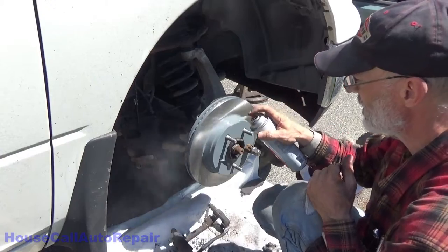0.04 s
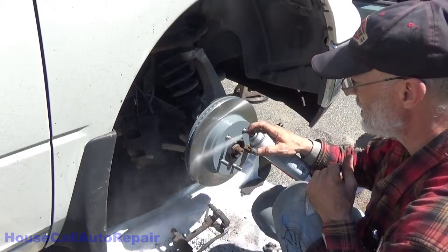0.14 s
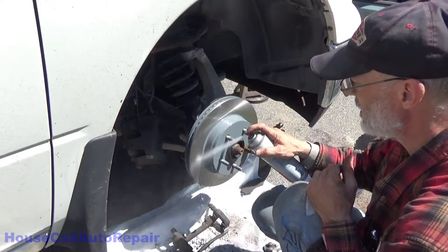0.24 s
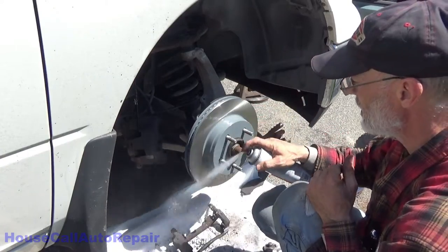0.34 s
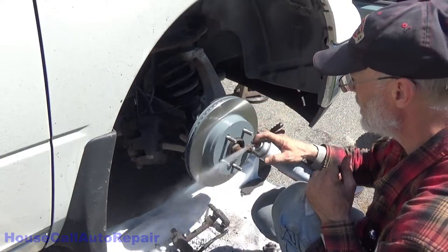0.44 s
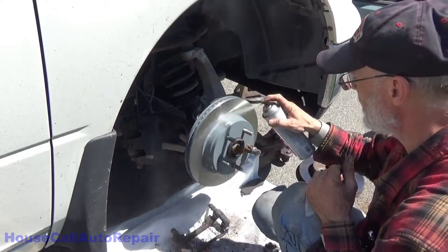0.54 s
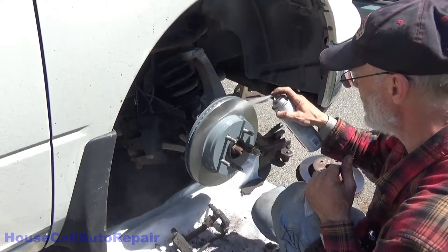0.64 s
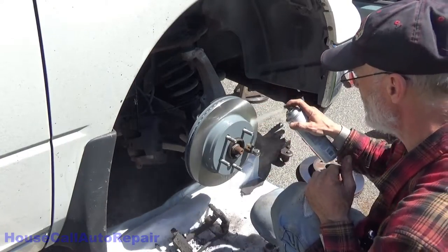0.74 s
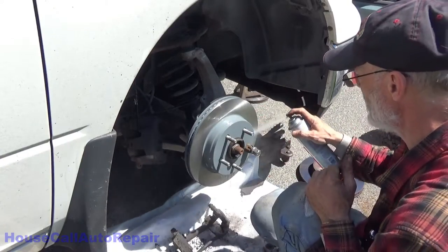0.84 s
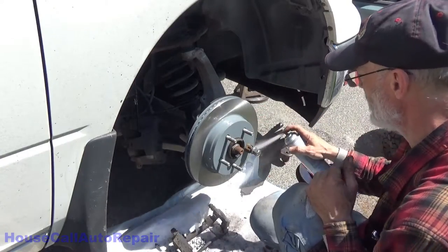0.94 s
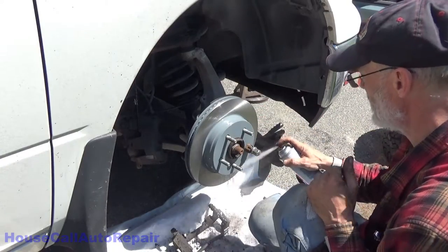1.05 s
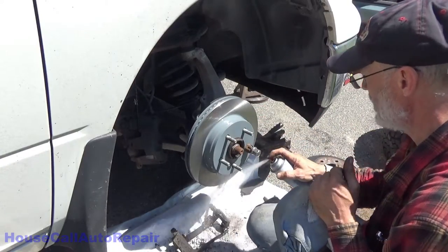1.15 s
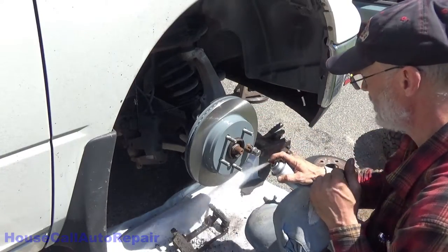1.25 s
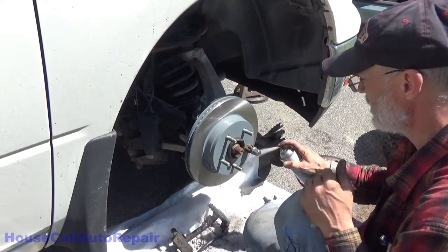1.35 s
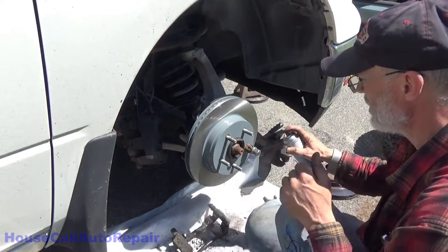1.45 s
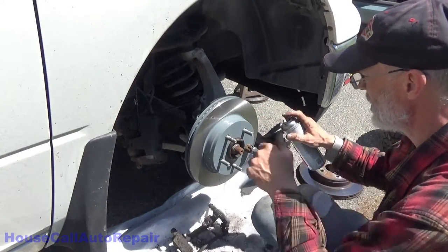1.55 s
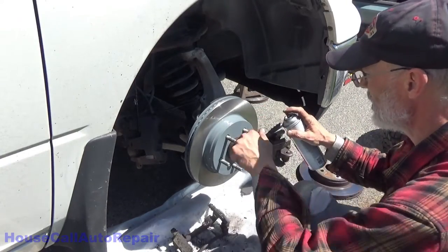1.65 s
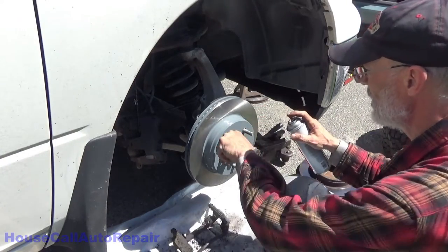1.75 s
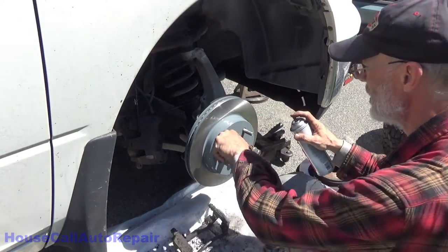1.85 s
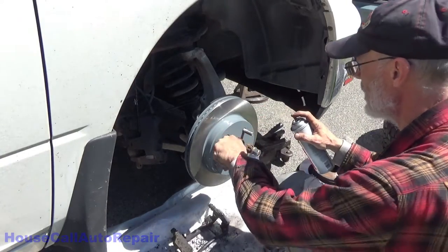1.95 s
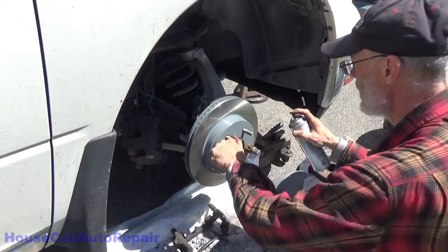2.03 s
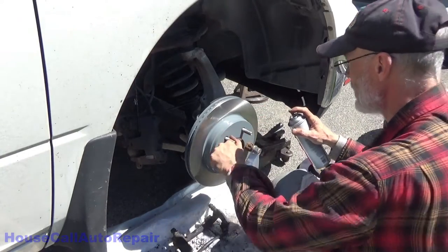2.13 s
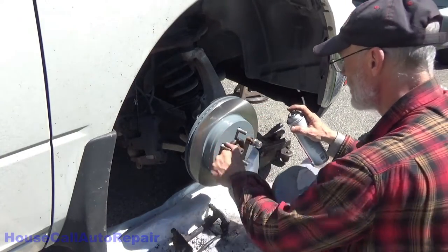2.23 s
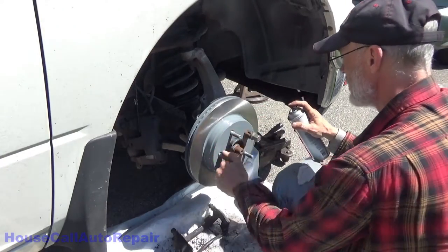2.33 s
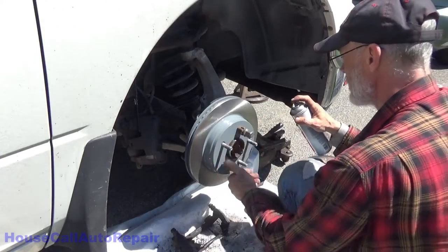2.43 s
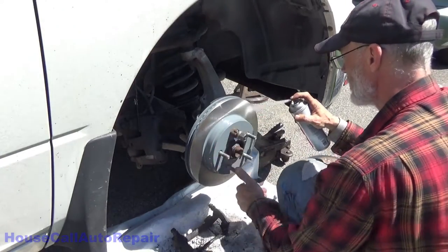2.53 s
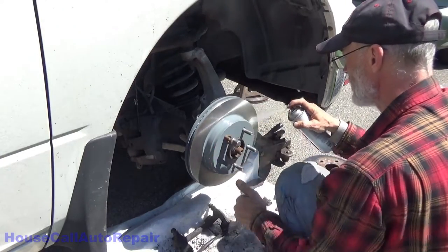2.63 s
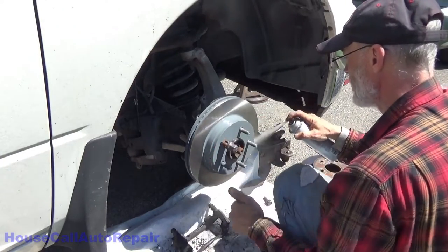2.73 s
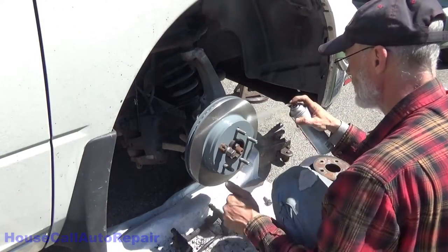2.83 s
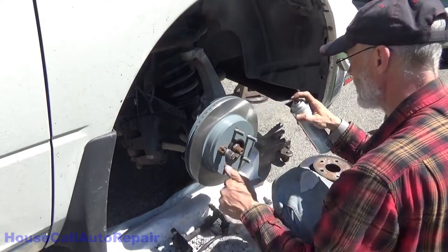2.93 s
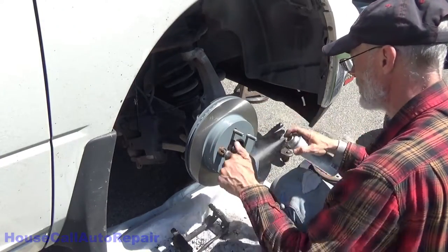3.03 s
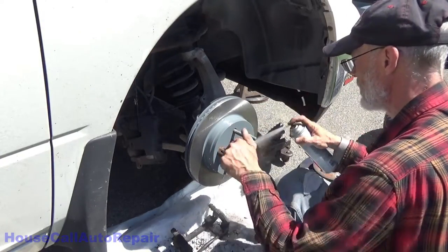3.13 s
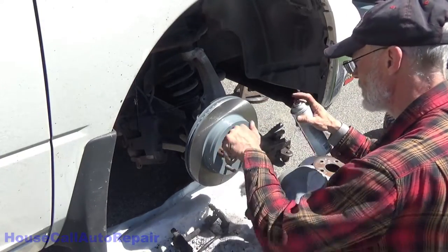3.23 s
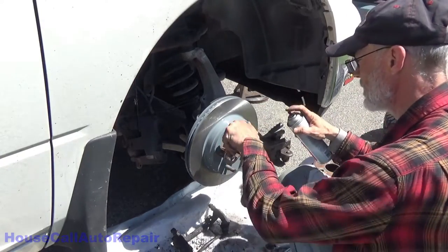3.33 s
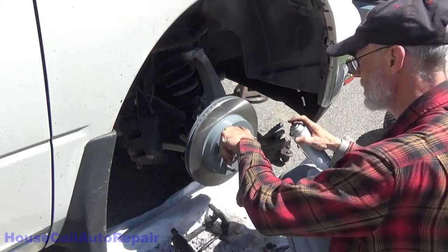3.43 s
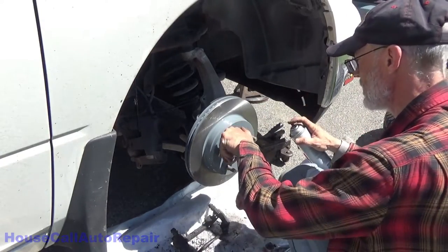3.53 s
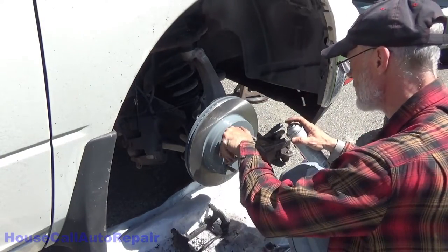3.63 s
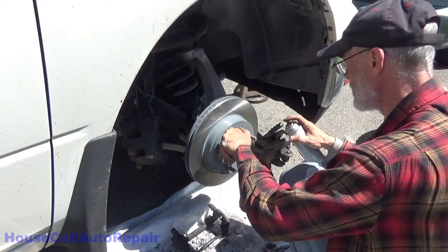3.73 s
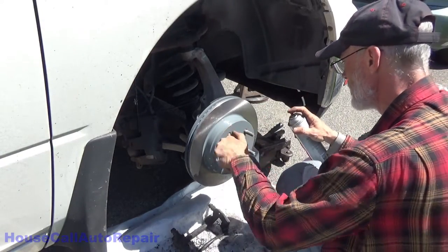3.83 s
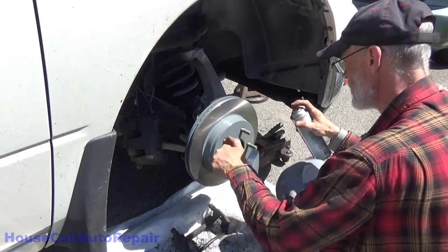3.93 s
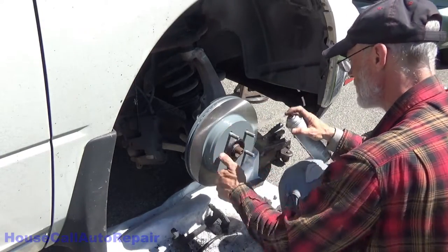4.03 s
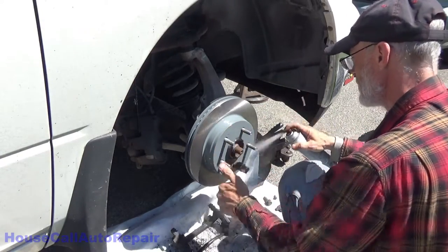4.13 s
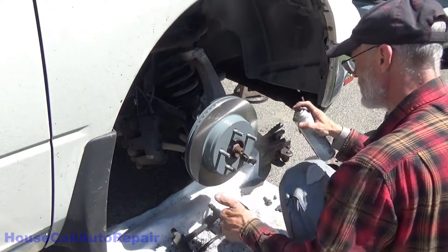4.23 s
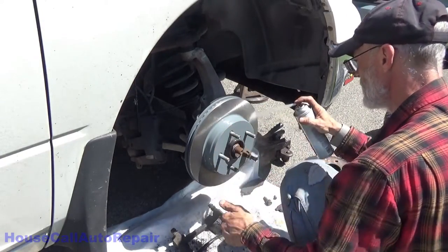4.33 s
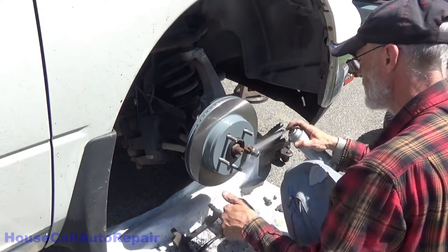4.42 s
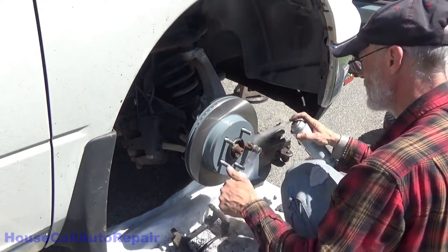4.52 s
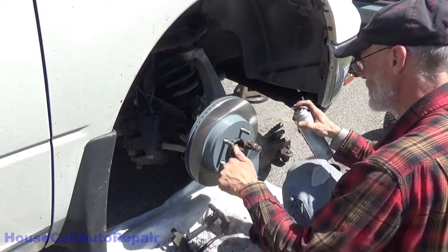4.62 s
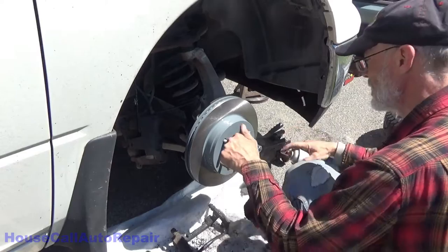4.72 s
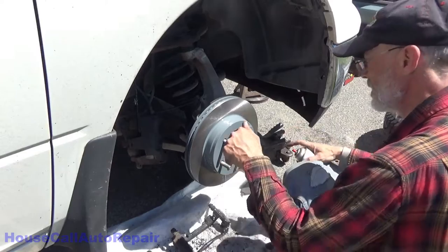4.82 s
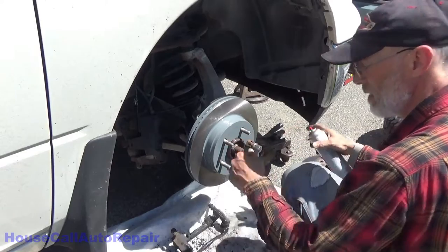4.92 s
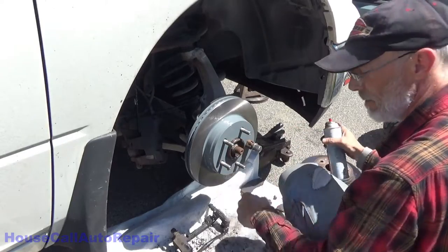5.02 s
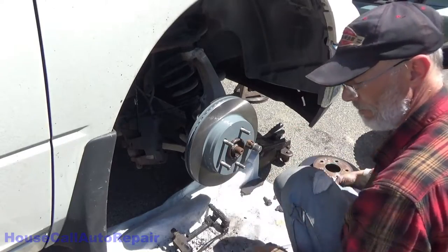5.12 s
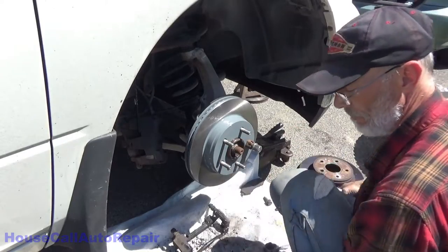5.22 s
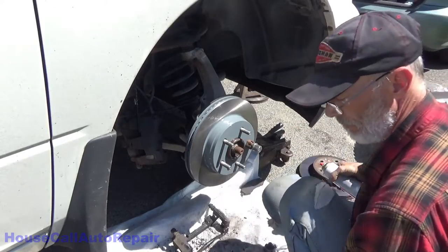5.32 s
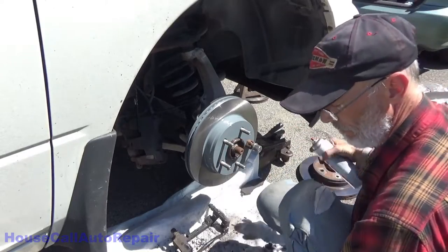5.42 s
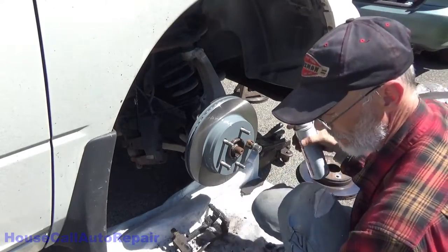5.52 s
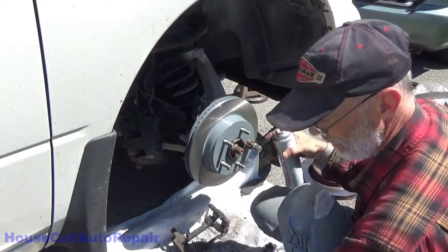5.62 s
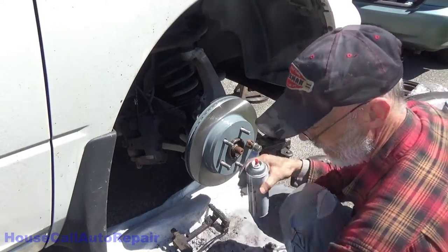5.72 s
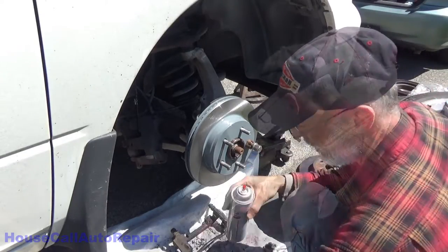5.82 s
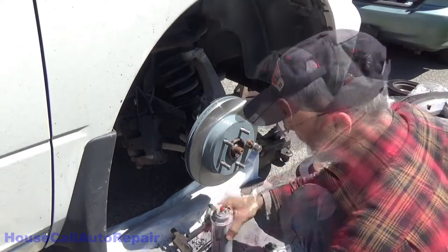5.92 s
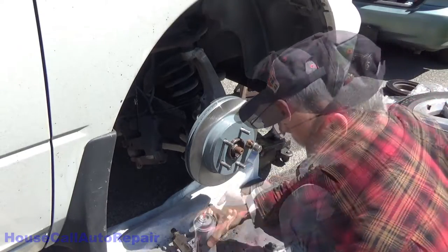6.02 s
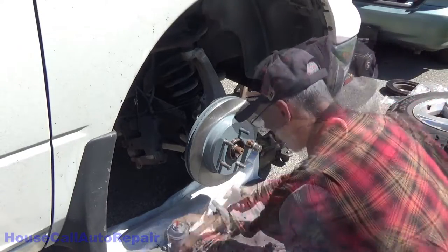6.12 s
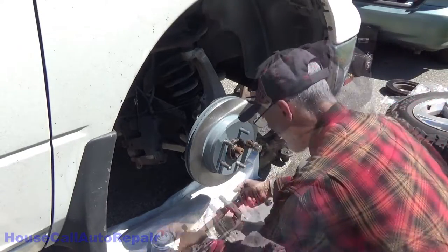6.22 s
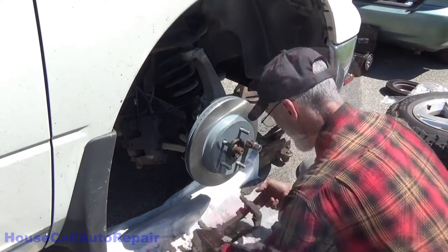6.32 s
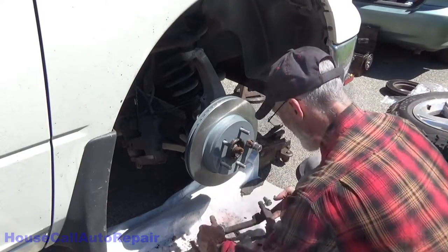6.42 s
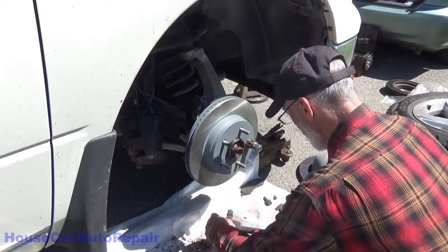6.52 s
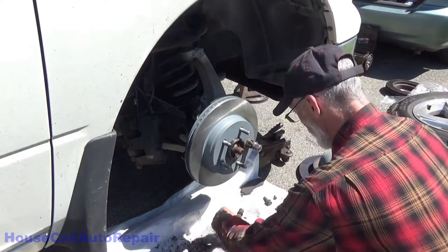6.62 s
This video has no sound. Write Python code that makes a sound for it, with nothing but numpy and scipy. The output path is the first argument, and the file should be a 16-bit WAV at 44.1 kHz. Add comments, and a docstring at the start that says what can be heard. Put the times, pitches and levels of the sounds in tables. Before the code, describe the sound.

A loud, bright aerosol hiss is already going at the start, close and near the middle, as cleaner hits a steel brake rotor. Drops drum lightly on the metal under the hiss, whose ringing tone slides a little as the hand moves. It cuts off at about 1.5 seconds. A second, shorter spray starts with a tiny squeak at 2.5 seconds and stops at 3.2. A third runs from 4.0 to 4.7 seconds. After each one the wet metal fizzes faintly for a moment. In the pauses a sleeve rustles softly and light touches tick on the can and small parts, around 1.8 and 3.3 seconds, with a small cluster near 5.2 and a few more until about 6.4. Quiet outdoor air with far traffic and a distant motor's low hum continues underneath to the end, near 6.7 seconds.

```python
"""A loud hiss comes three times, one long and two short: brake cleaner sprayed from a can, outdoors.
The jet rushes out of the nozzle and its drops drum on a steel brake rotor in a car's wheel well.
As the hand moves, the ringing pitches in the hiss (resonances) and its short echoes slide together.
In the pauses the wet metal fizzes, a sleeve rustles, small parts tick and a distant motor hums."""
import sys
import numpy as np
from scipy import signal
from scipy.fft import rfft, irfft, next_fast_len
from scipy.io import wavfile

SR = 44100
rng = np.random.default_rng(int(sys.argv[2]) if len(sys.argv) > 2 else 0)


def generate_wav(sig):
    """Save sig (samples, or channels by samples) to the path in sys.argv[1] as 16-bit PCM at SR."""
    pcm = np.round(np.clip(np.atleast_2d(sig).T, -1, 1) * 32767).astype(np.int16)
    wavfile.write(sys.argv[1], SR, pcm)


N = 293645

# Each press of the button. The can spits before it opens, and the jet can start short of full pressure.
# open_s, close_s, spit_db, spit_s, jet_db, shortfall_db, edge_tone_db, low_resonance_hz
PRESSES = [(-0.1, 1.4586, -28, .01, -16.5, 0, -25, 4040),
           (2.535, 3.208, -23.5, 0.044, -17, -3, -18.5, 3978),
           (4.009, 4.701, -20, 0.01, -17.5, -1.1, -14.5, 4220)]
# how the hand's aim changes the sound: time_s, main_resonance_hz, upper_resonance_hz, splash_db
AIM = [(0, 4580, 7240, -40.5), (0.27, 4764, 7646, -44.5), (0.55, 4833, 7322, -45.5),
       (0.75, 4953, 7580, -46.5), (1.0, 5163, 8100, -44.5), (1.12, 5069, 7640, -39.5),
       (1.25, 4773, 6920, -41), (1.38, 5136, 7730, -39.0), (1.45, 5222, 7333, -42),
       (2.56, 4760, 7340, -45.5), (2.66, 4705, 7380, -46), (2.8, 4713, 7275, -45.5),
       (2.94, 4760, 7030, -49.5), (3.09, 4800, 7600, -45), (3.19, 4593, 7085, -45.5),
       (4.04, 4650, 7172, -44), (4.19, 4700, 7357, -45.5), (4.33, 4620, 7440, -45.5),
       (4.5, 4690, 6896, -44.5), (4.68, 4560, 7130, -46.5)]
# tone colour of the swirling gas: pitch_hz, level_db
JET_COLOUR = [(500, -21), (1000, -19.5), (1500, -11.5), (2400, -9.5), (3100, -4.5), (3900, -3), (4700, -3),
              (5300, -2), (6000, -2), (7200, 0), (8200, 0), (9300, -3.5), (10800, -2), (13000, -11.5),
              (16000, -21)]
# the note of the hollow between hand, can and rotor: time_s, pitch_hz
GAP_PITCH = [(.3, 2758), (1.06, 1840), (1.27, 1916), (1.41, 2285), (2.55, 2352), (4.7, 2380)]
# tone colour of liquid drumming on the rotor and hub: pitch_hz, level_db
SPLASH_COLOUR = [(30, -36), (120, -31), (250, -2.5), (400, -1.5), (700, 0), (1000, 5.5), (1400, -7),
                 (2000, 7.5), (2500, -29), (3200, -19), (6000, -20.5)]
# hollows in the hub and brake that the jet sets ringing: pitch_hz, width_hz, level_db
BRAKE_HOLLOWS = [(470.5, 18, -6.5), (694.6, 7.4, -12), (858, 27, -20), (1380, 210, 0.5), (2394, 31, -1),
                 (2753, 60, -.5), (3500, 15, 3), (4210, 35, -3)]
# the jet sweeps over a hole: middle_s, half_length_s, pitch_hz, level_db
GURGLES = [(0.023, 0.022, 497, -38.5), (0.577, 0.01, 750, -37), (3.078, 0.017, 500, -46),
           (4.049, 0.014, 1108, -31.5), (4.039, 0.017, 553, -42.5), (4.212, 0.029, 614, -38),
           (4.358, 0.025, 500, -40), (4.505, 0.018, 690, -45)]
# the sleeve rubs on knee and can: middle_s, half_length_s, level_db
RUBS = [(1.865, .03, -56.5), (2.397, 0.036, -73), (3.42, 0.072, -60), (3.62, .05, -63), (3.974, .03, -62),
        (5.191, .075, -53), (5.37, 0.037, -55.5), (5.6, 0.042, -67), (6.195, 0.016, -64),
        (6.65, 0.055, -69)]
# tone colour of rubbed cloth: pitch_hz, level_db
CLOTH_COLOUR = [(2000, -22), (3500, -14), (5000, -0.5), (7000, -0.5), (9000, -2.5), (11000, -13.5),
                (13000, -17), (16000, -21)]
# the can rings faintly under the cloth: pitch_hz, width_hz, level_db
CAN_RINGS = [(4900, 513, 0), (6400, 380, -4.5), (8240, 750, -7)]
# touches on the can and small parts: start_s, level_db, pitch_hz
TICKS = [(1.723, -39, 6500), (1.836, -43, 9000), (3.277, -32, 4900), (3.576, -48, 12500),
         (3.742, -50, 12500), (3.832, -45, 9500), (4.932, -46, 9500), (5.062, -41, 6000),
         (5.181, -37, 6574), (5.199, -30.5, 5140), (5.231, -33, 5400), (5.271, -36, 5100),
         (5.684, -39, 5030), (5.719, -43, 9500), (5.770, -45, 9350), (6.212, -37, 8650),
         (6.354, -49, 13500)]
# tone colour of the outdoor background: pitch_hz, level_db
AIR_COLOUR = [(25, -18), (55, -23), (85, -14), (100, -12.5), (135, -7.5), (200, -12), (310, -10.5),
              (400, -8.5), (640, -5), (1300, -6), (1950, -5), (3200, -10), (4200, -12.5), (8600, -21.5),
              (16000, -37)]
# its level over time: it eases down, drops near 5.9 s and comes back up at 6.6 s: time_s, level_db
AIR_LEVEL = [(0, -47), (4.0, -50), (5.3, -49), (5.9, -52), (6.55, -52.5), (6.62, -50)]
# the wheel well rings with that background: pitch_hz, width_hz, level_db
WELL_RINGS = [(390, 91, -1), (684, 370, -2.5), (1470, 19, -1), (1890, 130, 0), (2813, 82, 1),
              (3350, 53, -3)]
# the distant motor: time_s, pitch_hz, level_db
MOTOR_HUM = [(0, 170.4, -58), (3.9, 170.5, -59), (5.0, 171, -58.3), (5.95, 171, -63), (6.35, 168, -68),
             (6.66, 160, -62)]
# stereo width (scattered against direct sound), near and far: pitch_hz, scattered_db
NEAR_WIDTH = [(100, -38), (350, -36), (900, -35), (1700, -66.5), (3400, -15), (4600, -19), (6000, -35),
              (8500, -18), (11000, -22), (13000, -25)]
AIR_WIDTH = [(30, -17), (70, -26), (160, -30), (350, -19), (600, -12), (1100, -13), (4000, -9), (8000, -13),
             (10500, -30)]
# how much louder the left side is, near and far: pitch_hz, left_over_right_db
NEAR_BALANCE = [(1200, -0.5), (2400, -0.7), (4000, -1), (5600, -0.5), (7200, 0.5), (8200, -0.2),
                (10700, -0.5), (12500, 0)]
AIR_BALANCE = [(200, 0.5), (600, 1.5), (1400, 2.5), (3200, 1.5), (4500, 1.4), (7500, 2.5), (10000, -1)]

# the aim at the usual distance from the rotor
USUAL_MAIN_HZ, USUAL_UPPER_HZ, USUAL_SPLASH_DB = 4700, 7350, -43
CLOSE_GAIN = .9   # near the metal, bounce and upper resonance gain this many dB per dB of splash


def spray():
    """Gas and drops leave the can while the valve is open, and their sound bounces off the rotor."""
    main_hz, upper_hz, splash_db = in_time(AIM)
    upper_hz = upper_hz + 45 * drift(14)   # the hand trembles
    closer_db = splash_db - USUAL_SPLASH_DB
    sound = jet(main_hz, upper_hz, closer_db) + splash(splash_db) + gurgles()
    sound *= valve(opening_s=.004, closing_s=.0056, dribble_db=-16, dribble_s=.021)
    sound = signal.sosfilt(signal.butter(2, 135, "high", fs=SR, output="sos"), sound)
    round_trip_s = 3.026 / upper_hz   # about three cycles of the upper resonance
    returning = np.clip(.19 * from_db(CLOSE_GAIN * closer_db), 0, .5)
    return bounce(sound, round_trip_s, returning)


def jet(main_hz, upper_hz, closer_db):
    """Gas roars through the nozzle, rings in the spaces ahead of it and sings on edges."""
    jet_db, edge_db, low_hz = finger(settle_s=.2)
    rush = rng.standard_normal(N) + from_db(-11.5) * grains(per_s=5000, spread_db=5)
    hiss = slide(colour(rush, JET_COLOUR), ratio=(upper_hz / USUAL_UPPER_HZ) ** .55)
    # three resonances between nozzle, hand and rotor; the low one fades as the splash grows louder
    low_db = -10.5 - .0009 * (main_hz - USUAL_MAIN_HZ) - .6 * closer_db + 2.42 * drift(7.4)
    low = from_db(low_db) * band_noise(low_hz, width_hz=670)
    main = from_db(-7.5) * band_noise(main_hz, width_hz=1060)
    upper_db = -19 + CLOSE_GAIN * closer_db + 1.8 * drift(11)
    upper = from_db(upper_db) * band_noise(upper_hz - 60, width_hz=650)
    gap = from_db(-22 + 1.2 * closer_db) * band_noise(in_time(GAP_PITCH)[0], width_hz=350)
    edge_tone = from_db(edge_db + 1.8 * drift(11)) * band_noise(1.55 * upper_hz, width_hz=1300)
    loudness = from_db(jet_db + .28 + .56 * drift(60))
    return loudness * (from_db(-3) * hiss + low + main + upper + gap + edge_tone)


def finger(settle_s):
    """Each press has its own grip and settles to its own pressure; gives jet_db, edge_db, low_hz."""
    t = np.arange(N) / SR
    grip = np.zeros((3, N))
    for open_s, _, _, spit_s, full_db, shortfall_db, edge_db, low_hz in PRESSES:
        jet_db = full_db + shortfall_db * np.exp(-np.maximum(t - open_s, 0) / settle_s)
        grip = np.where(t > open_s - spit_s, np.broadcast_arrays(jet_db, edge_db, low_hz), grip)
    return grip


def valve(opening_s, closing_s, dribble_db, dribble_s):
    """The flow, from 0 to 1: the valve spits, snaps open and shuts, then the nozzle empties."""
    t, flow = np.arange(N) / SR, np.zeros(N)
    for open_s, close_s, spit_db, spit_s, *_ in PRESSES:
        spit = from_db(spit_db) * np.clip((t - open_s) / spit_s + 1, 0, 1) ** .5
        opening = np.clip((t - open_s) / opening_s, 0, 1)
        released_s = np.maximum(t - close_s, 0)
        closing = np.exp(-released_s / closing_s)
        dribble = from_db(dribble_db) * np.exp(-released_s / dribble_s)
        flow += np.maximum(opening, spit) * np.maximum(closing, dribble)
    return flow


def splash(level_db):
    """Thousands of drops drum on the rotor, and the hollows of the brake ring."""
    drops = colour(grains(per_s=4000, spread_db=.5), SPLASH_COLOUR)
    loudness = from_db(level_db + drift(50))
    return loudness * (from_db(2) * drops + from_db(-2.5) * ringing_noise(BRAKE_HOLLOWS))


def gurgles():
    """Blowing across a hole gives a short, hollow puff."""
    return sum(from_db(db - 1.5) * swell(middle_s, half_s) * band_noise(hz, width_hz=.37 * hz)
               for middle_s, half_s, hz, db in GURGLES)


def squeak(middle_s, half_s, pitch_hz, glide_hz_per_s):
    """Gas whistles once through the half-open valve, gliding upward."""
    hz = pitch_hz + glide_hz_per_s * np.clip(np.arange(N) / SR - middle_s, -2 * half_s, 2 * half_s)
    whistle = from_db(-10) * band_noise(hz, width_hz=130) + band_noise(2 * hz, width_hz=450)
    return from_db(-34.5) * swell(middle_s, half_s) * whistle


def bounce(x, delay_s, strength):
    """Sound goes to and fro between rotor and hand, boosting some pitches and thinning others."""
    first = strength * delayed(x, delay_s)
    second = strength * delayed(first, delay_s)
    return (x + first + second) / np.sqrt(1 + strength ** 2 + strength ** 4)


def nearby_echoes(x, echo_db, sway, count):
    """Arm, brake and wheel arch throw the hiss back; the echoes lag more as the upper resonance falls."""
    stretch = USUAL_UPPER_HZ / in_time(AIM)[1]
    delays_s = np.geomspace(.0013, .006, count) * rng.uniform(.85, 1.15, count)
    echoes = sum(delayed(x, delay_s * (stretch + sway * drift(5))) for delay_s in delays_s)
    return x + from_db(echo_db) * echoes


def fizz():
    """After each spray, tiny bubbles burst as the cleaner boils off the wet metal."""
    bubbles = colour(grains(per_s=8200, spread_db=6), JET_COLOUR)
    return from_db(-57) * after_release(fade_s=.29) * bubbles


def sleeve():
    """Cloth fibres catch and slip on the can, with a faint rustle left between rubs."""
    rubbing = from_db(-67) + sum(from_db(db - 2) * swell(s, half_s) for s, half_s, db in RUBS)
    slips = rng.standard_normal(N) + from_db(7) * grains(per_s=900, spread_db=5)
    fibres = from_db(-2) * colour(slips, CLOTH_COLOUR)
    return rubbing * from_db(2.2 * drift(66)) * (fibres + from_db(-1) * ringing_noise(CAN_RINGS))


def ticks(fade_s, width_hz):
    """Each touch makes a brief, bright crack around its own pitch."""
    out, t = np.zeros(N + SR), np.arange(SR // 16) / SR
    for start_s, level_db, hz in TICKS:
        crack = rng.standard_normal(len(t)) * np.exp(-t / fade_s)
        crack = resonate(resonate(crack, hz, width_hz), hz, width_hz)
        at = round(start_s * SR)
        out[at:at + len(t)] += from_db(level_db - 1) * crack / np.abs(crack).max()
    return out[:N]


def wheel_well(x, echo_s, echo_db):
    """Many quick echoes off the wheel arch and the ground, dying by 60 dB in echo_s."""
    t = np.arange(SR // 4) / SR
    walls = rng.standard_normal(len(t)) * from_db(-60 * t / echo_s) * (t > .001)
    return x + from_db(echo_db) * signal.fftconvolve(x, walls / np.linalg.norm(walls))[:N]


def outdoors():
    """Far traffic and leaves, heard in the hollow wheel well; a little louder just after each spray."""
    level_db = in_time(AIR_LEVEL)[0] + 3 * after_release(fade_s=.79)
    air = colour(rng.standard_normal(N), AIR_COLOUR)
    hollow = from_db(-6.5) * unit_level(ringing_noise(WELL_RINGS))
    return from_db(level_db) * (air + hollow)


def motor():
    """A distant motor hums on one slightly unsteady note."""
    hz, level_db = in_time(MOTOR_HUM)
    loudness = from_db(level_db - 2 + .58 * drift(16))
    phase = 2 * np.pi * np.cumsum(hz + drift(14)) / SR
    return loudness * unit_level(np.sin(phase))


def two_ears(x, width, balance, echo_s):
    """Direct sound favours one side, pitch by pitch; scattered sound makes the two sides differ."""
    t = np.arange(SR // 5) / SR
    scatter = rng.standard_normal(len(t)) * from_db(-60 * t / echo_s)
    size = next_fast_len(N + len(t))
    bins_hz = np.maximum(np.arange(size // 2 + 1) * SR / size, 1)
    scattered = from_db(db_at(bins_hz, width)) * rfft(scatter, size) / np.linalg.norm(scatter)
    ear = np.array([[1], [-1]])   # left, right
    direct = from_db(ear * db_at(bins_hz, balance) / 2)
    return irfft(rfft(x, size) * (direct + ear * scattered), size)[:, :N]


def from_db(db):
    """Turn decibels into a number to multiply by."""
    return 10 ** (np.asarray(db) / 20)


def unit_level(x):
    """Scale a sound to an average (rms) level of 1."""
    return x / np.sqrt(np.mean(x ** 2) + 1e-20)


def in_time(rows):
    """Join a table's timed points with lines, giving one curve per column."""
    times_s, *columns = np.transpose(rows)
    return [np.interp(np.arange(N) / SR, times_s, column) for column in columns]


def db_at(hz, rows):
    """Look up levels in a table of pitch_hz, level_db."""
    pitch_hz, level_db = np.transpose(rows)
    return np.interp(np.log(hz), np.log(pitch_hz), level_db)


def colour(x, spectrum):
    """Give plain noise a tone colour, at level 1."""
    size = next_fast_len(N)
    bins_hz = np.maximum(np.arange(size // 2 + 1) * SR / size, 1)
    bass_cut = np.minimum(bins_hz / spectrum[0][0], 1) ** 2
    gain = from_db(db_at(bins_hz, spectrum)) * bass_cut
    return unit_level(irfft(rfft(x, size) * gain, size)[..., :N])


def drift(turns_per_s):
    """A random wander, typically about 1 away from zero."""
    points = rng.standard_normal(8192)
    return np.interp(np.arange(N) / SR * turns_per_s, np.arange(len(points)), points) * np.sqrt(3 / 2)


def swell(middle_s, half_s):
    """A smooth rise to 1 and back down."""
    return np.exp(-((np.arange(N) / SR - middle_s) / half_s) ** 2 / 2)


def after_release(fade_s):
    """Jump up by 1 as each press ends, then die away."""
    t = np.arange(N) / SR
    return sum((t > close_s) * np.exp(-np.abs(t - close_s) / fade_s) for _, close_s, *_ in PRESSES)


def grains(per_s, spread_db):
    """Tiny random hits of uneven size, at level 1."""
    sizes = from_db(spread_db * np.clip(rng.standard_normal(N), -2, 2)) * rng.choice([-1, 1], N)
    return unit_level(sizes * (rng.random(N) < per_s / SR))


def band_noise(hz, width_hz):
    """Noise close to one pitch, which may move; level 1."""
    slow = signal.sosfilt(signal.butter(2, width_hz / 2, fs=SR, output="sos"), rng.standard_normal((2, N)))
    phase = 2 * np.pi * np.cumsum(hz * np.ones(N)) / SR
    return unit_level(slow[0] * np.cos(phase) - slow[1] * np.sin(phase))


def resonate(x, hz, width_hz):
    """Let one pitch ring through and weaken the rest."""
    r = np.exp(-np.pi * width_hz / SR)
    feedback = [1, -2 * r * np.cos(2 * np.pi * hz / SR), r * r]
    return signal.lfilter(np.array([1, 0, -1]) * (1 - r * r) / 2, feedback, x + 1e-18)


def ringing_noise(rings):
    """Noise keeps several resonances ringing."""
    return sum(from_db(db) * unit_level(resonate(rng.standard_normal(N), hz, width_hz))
               for hz, width_hz, db in rings)


def delayed(x, delay_s):
    """Play a sound late, by a delay that may change."""
    fine = signal.resample_poly(x, up=4, down=1)
    return np.interp((np.arange(N) - delay_s * SR) * 4, np.arange(len(fine)), fine, left=0)


def slide(x, ratio):
    """Multiply every pitch in a noise by a ratio that may change."""
    return delayed(x, np.cumsum(1 - ratio) / SR)


def scene():
    """The can and hands are near the middle, the outdoor background a little to the left."""
    can = spray() + squeak(middle_s=2.528, half_s=.009, pitch_hz=2700, glide_hz_per_s=10000)
    can = nearby_echoes(can, echo_db=-15.5, sway=.025, count=4)
    can = wheel_well(can, echo_s=.09, echo_db=-16)
    small_sounds = sleeve() + fizz() + ticks(fade_s=.0026, width_hz=2400)
    small_sounds = wheel_well(small_sounds, echo_s=.07, echo_db=-13)
    near = two_ears(can + small_sounds, NEAR_WIDTH, NEAR_BALANCE, echo_s=.06)
    around = two_ears(outdoors(), AIR_WIDTH, AIR_BALANCE, echo_s=.2)
    return near + around + motor()


def record(dry):
    """Steeply cut the very highest treble."""
    cutoff_hz = 15900
    return signal.sosfilt(signal.ellip(12, .1, 80, cutoff_hz, fs=SR, output="sos"), dry)


dry = scene()
out = record(dry)
generate_wav(out)
```